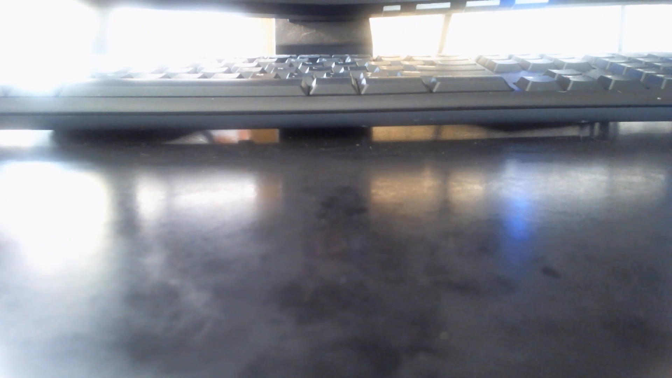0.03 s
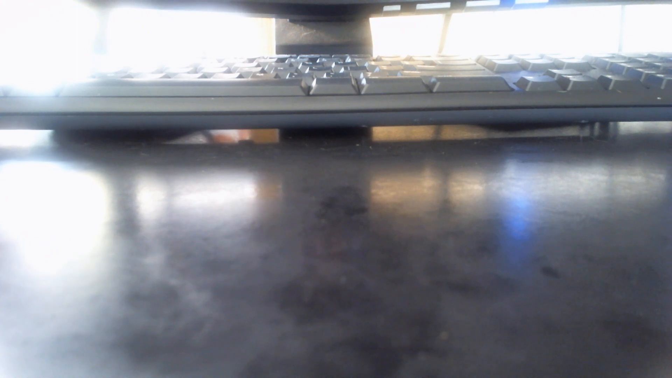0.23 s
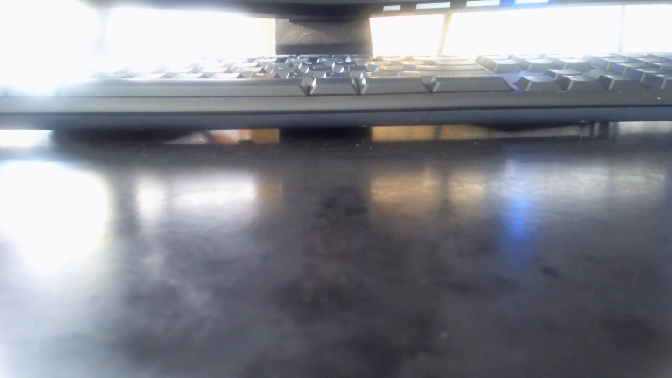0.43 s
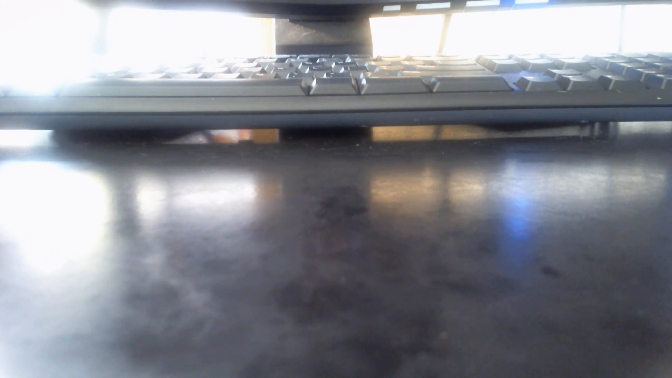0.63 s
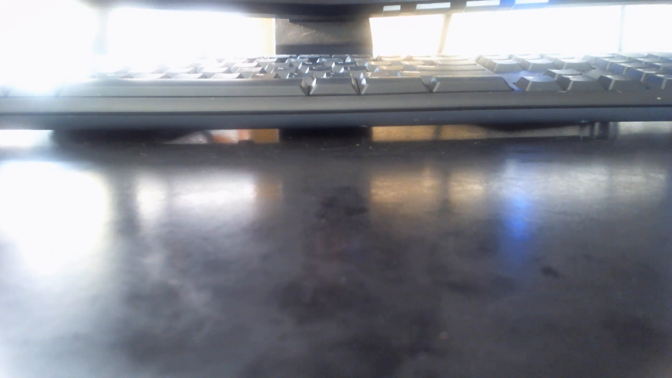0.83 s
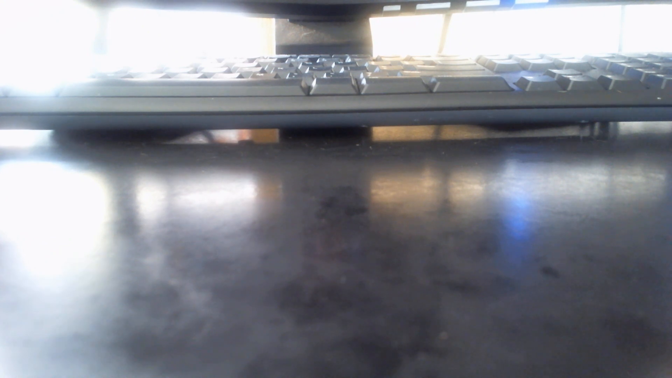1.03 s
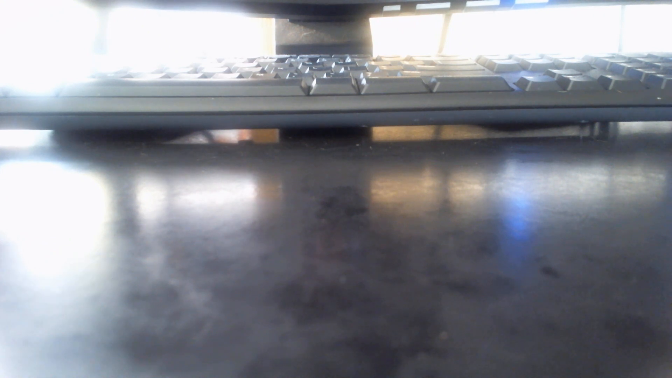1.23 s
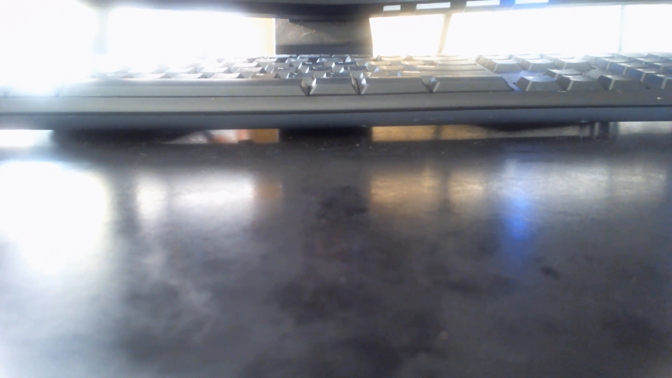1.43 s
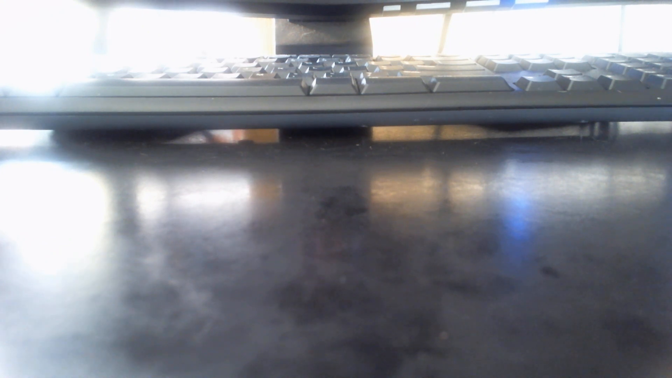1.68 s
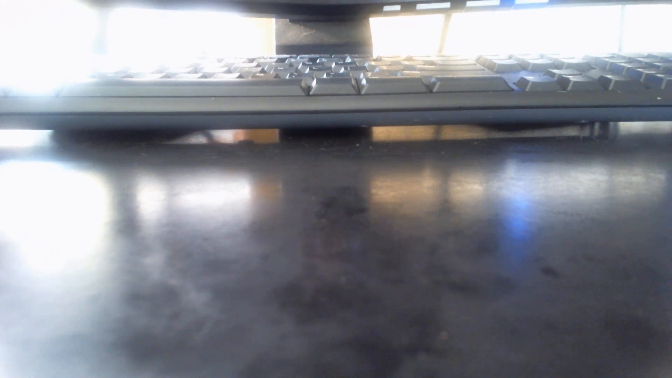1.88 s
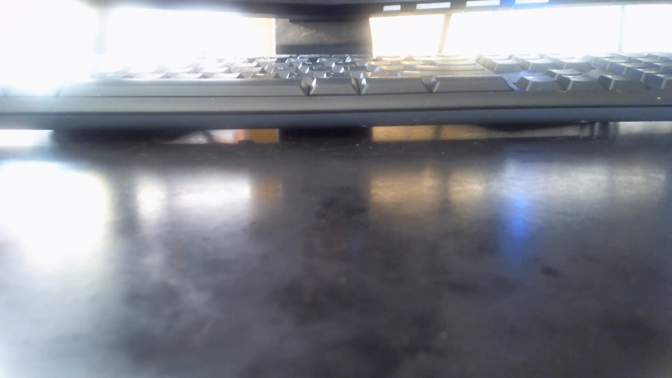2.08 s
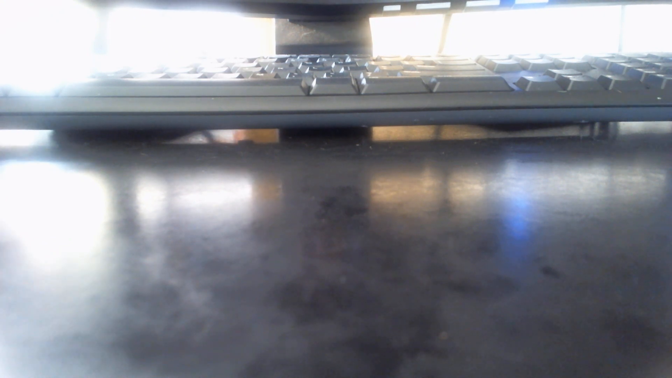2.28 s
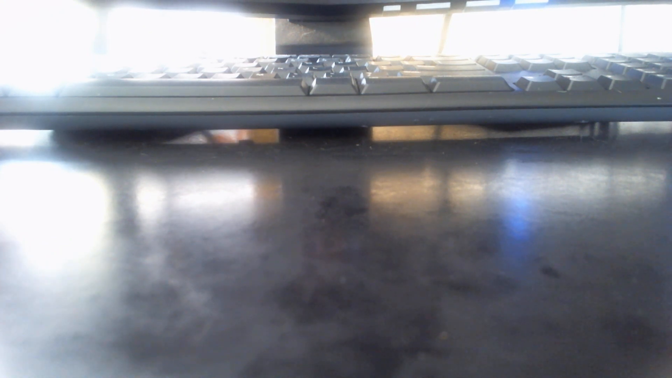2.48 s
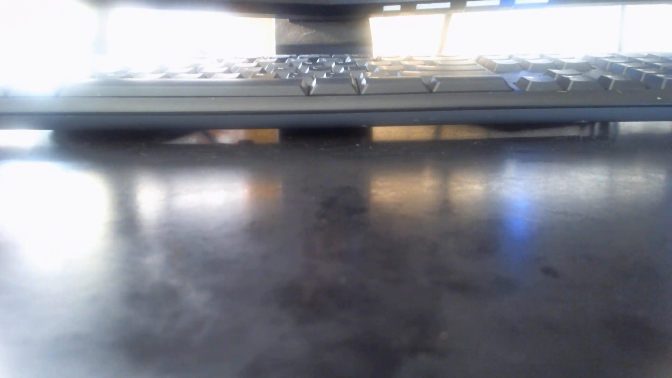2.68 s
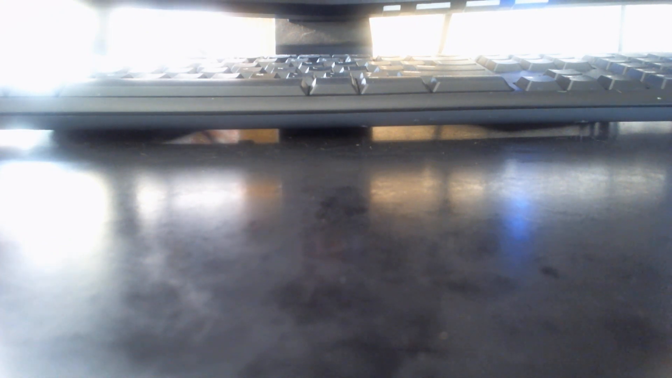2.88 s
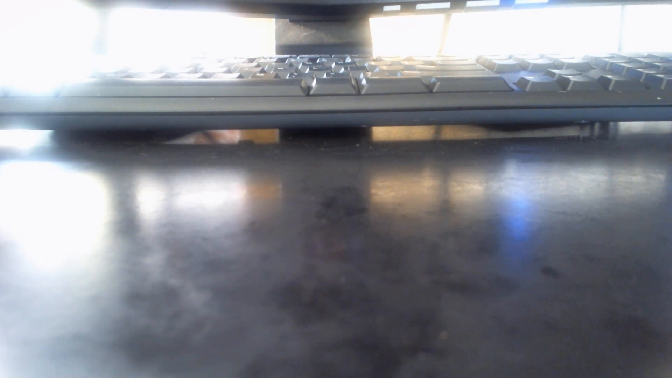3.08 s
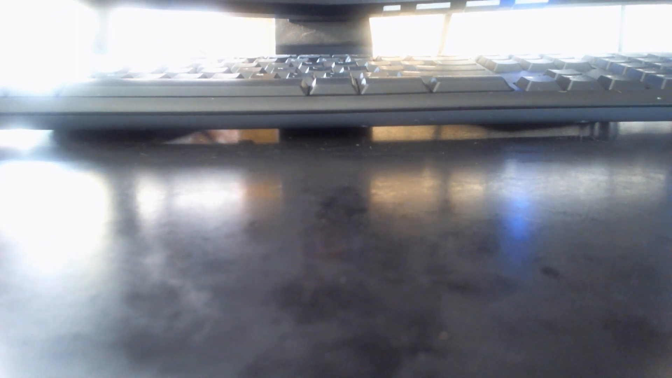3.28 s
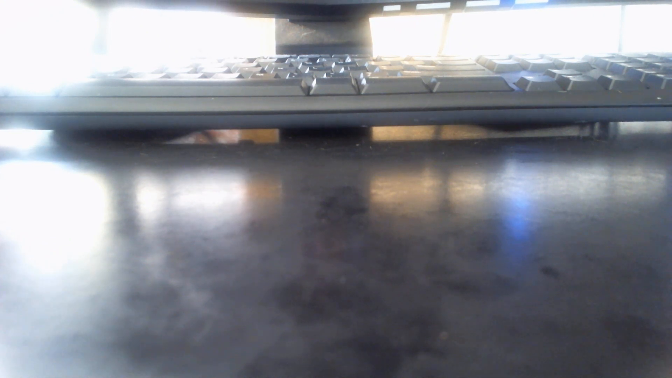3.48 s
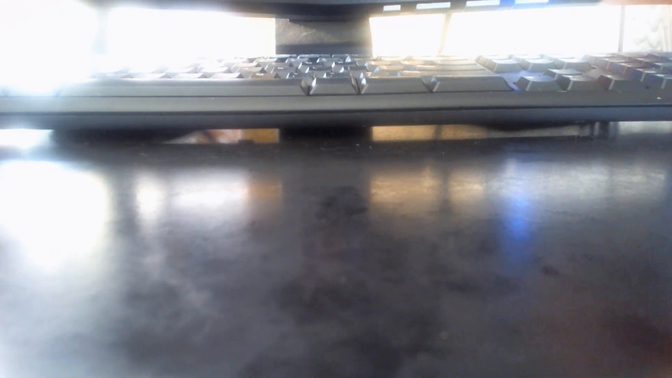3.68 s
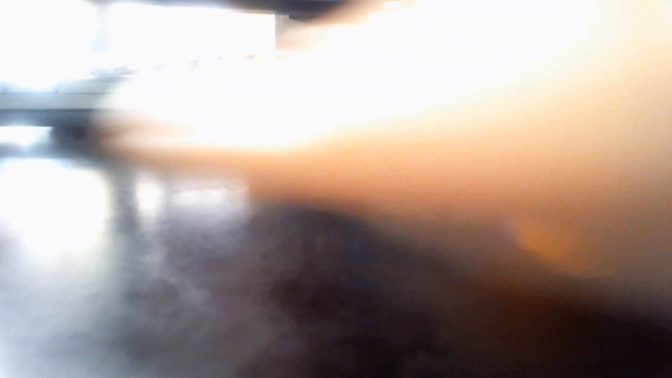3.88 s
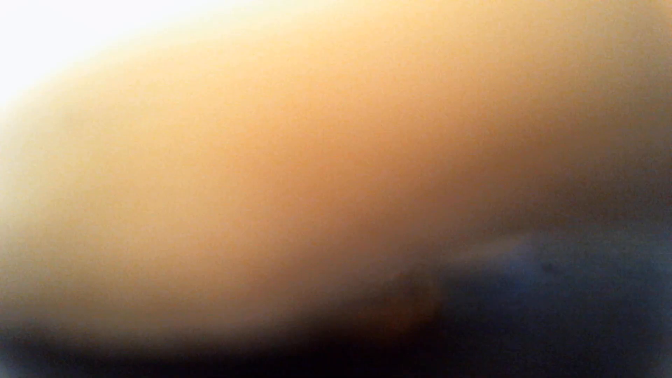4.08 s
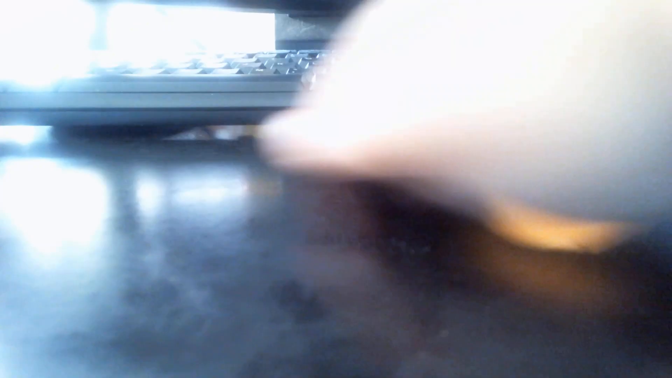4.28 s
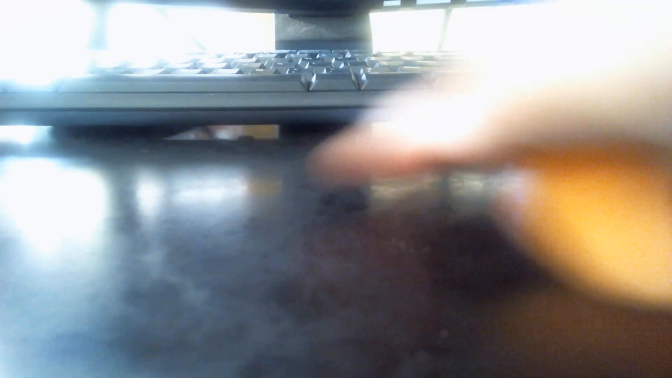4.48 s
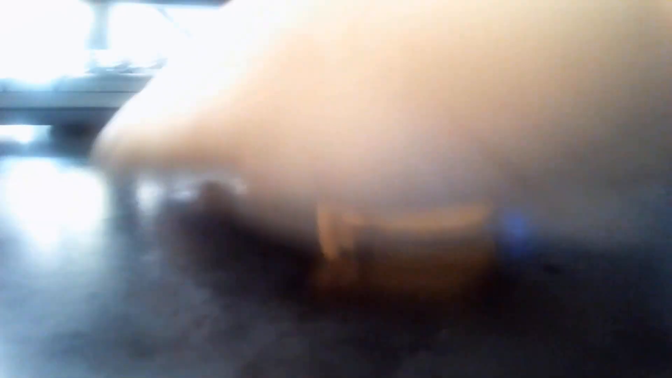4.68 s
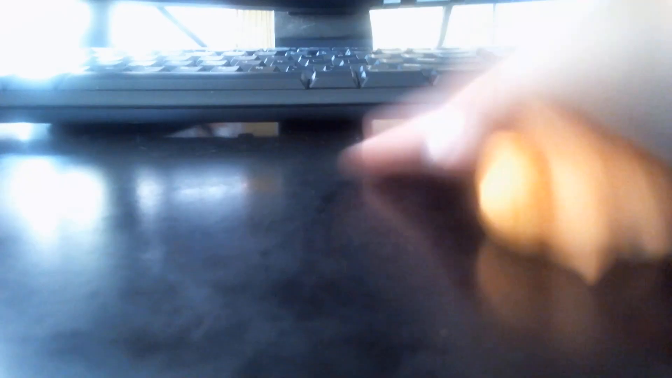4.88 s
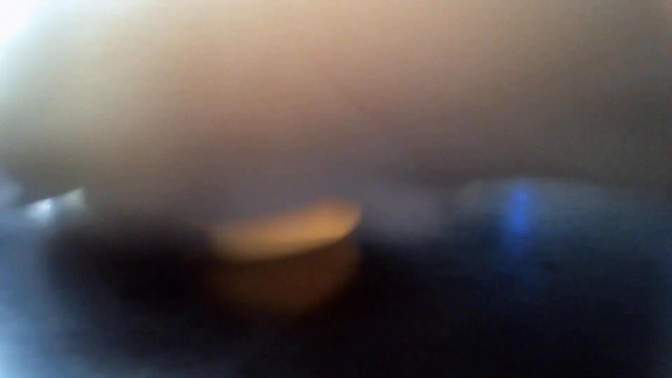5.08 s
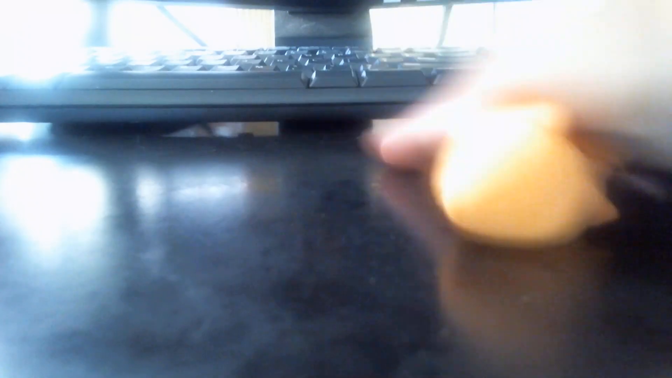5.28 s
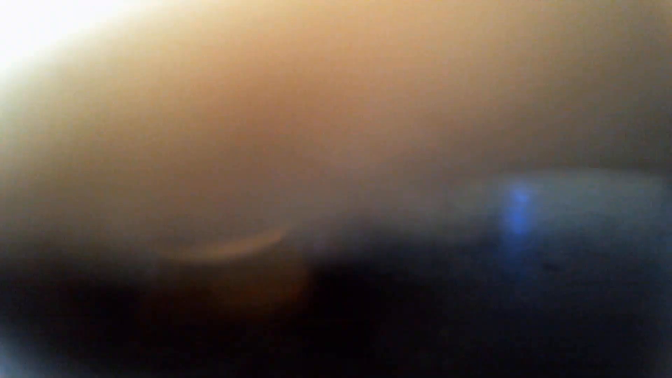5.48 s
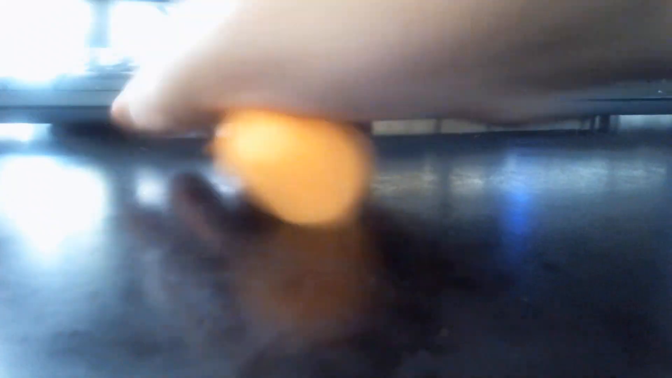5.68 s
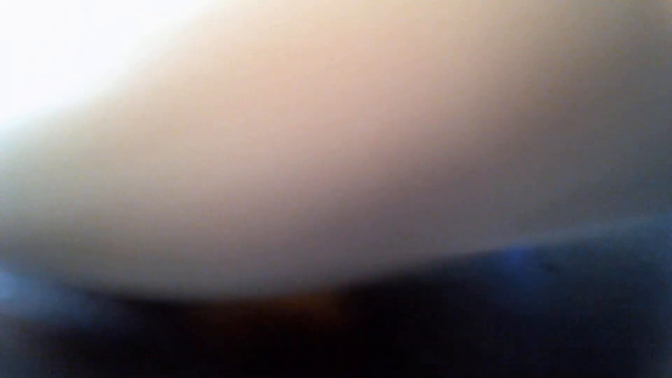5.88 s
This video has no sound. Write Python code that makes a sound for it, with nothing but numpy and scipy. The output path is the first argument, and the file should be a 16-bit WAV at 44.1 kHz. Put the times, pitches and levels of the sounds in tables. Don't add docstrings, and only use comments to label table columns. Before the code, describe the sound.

Faint whine and fluttering buzz over room hiss, then a hand clicks, scratches and scuffs a hard desk very close to the microphone.

```python
import sys
import numpy as np
from scipy import signal
from scipy.fft import rfft, irfft
from scipy.io import wavfile
from scipy.ndimage import uniform_filter1d

SR = 44100
rng = np.random.default_rng(int(sys.argv[2]) if len(sys.argv) > 2 else 0)


def boost(x):
    u = np.asarray(x, float) / 20
    return 10 ** u


def dump_mix(stems):
    frames = np.atleast_2d(stems).T
    limited = np.clip(frames, -1, 1)
    pcm = np.round(limited * 32767).astype(np.int16)
    wavfile.write(sys.argv[1], SR, pcm)


N = 261072

# frequency in Hz, level in dB.
DESK_TONE = [(150, -3), (280, 8.5), (550, 4), (900, 1), (1500, 3), (2100, 5.5), (2700, -3), (4000, -35)]
FIZZ_DB_PER_OCTAVE = 8


def evened(x):
    return x / np.sqrt(np.mean(x ** 2) + 1e-20)


def add(mix, s, sound):
    part = mix[round(s * SR):][:len(sound)]
    part += sound[:len(part)]


def coloured(x, points):
    hz, db = np.transpose(points)
    f = np.fft.rfftfreq(len(x), 1 / SR)
    gain = boost(np.interp(np.log(f + 1), np.log(hz + 1), db))
    return irfft(rfft(x) * gain, len(x))


def resonate(x, hz, width):
    turn = np.exp(2j * np.pi * np.cumsum(hz * np.ones(len(x))) / SR)
    r = np.exp(-np.pi * width / SR)
    return 2 * (turn * signal.lfilter([1 - r], [1, -r], x / turn)).real


def rubbing():
    # time in seconds, pressure in dB, speed from 0 to 1, palm share in dB.
    rubs = [
        [(3.586, -41, 0.7, -1), (3.63, -35.5, 0.4, -7), (3.72, -36.5, 0.3, -4), (3.78, -43, 0.52, -0.5),
         (3.934, -45, 0.53, -4), (4.07, -37, 0.23, -5), (4.2, -39.5, 0.1, -2), (4.386, -38, 0.58, -5),
         (4.6, -54, 0.4, 6.5)],
        [(4.6, -39.5, .05, 6), (4.73, -46.5, 0.53, -6.5), (4.82, -47.5, 0.68, 0), (4.926, -39.5, 1, -0.5),
         (5.02, -42.5, 0.58, -3.5), (5.1, -40, 0.52, -8.5), (5.22, -43.5, 0.23, -4)],
        [(5.22, -43, 0.2, 0), (5.286, -40, 0.57, -10), (5.338, -43, 0.86, -16), (5.42, -44, 0.52, -5),
         (5.46, -47.5, 0.55, 7), (5.52, -37, 0.58, -10), (5.59, -46, 0.43, -5), (5.7, -54, 0, 5)],
    ]
    # start in seconds, length in seconds, pressure in dB,
    # speed from 0 to 1, palm share in dB.
    brushes = [(1.21, .14, -56, 0.1, 0), (1.878, .11, -42.5, .1, -7), (1.989, 0.28, -52.5, .3, -5),
               (2.602, .24, -51, .35, -1.5), (2.871, 0.093, -49, .35, -5), (3.098, .12, -55, 0.3, -3),
               (3.467, 0.082, -49, 0.1, -12), (5.7, 0.21, -47, .45, -7)]
    # start in seconds, length in seconds, first pitch in Hz, last pitch in Hz, level in dB.
    squeaks = [(2.571, 0.0053, 1710, 1750, -40.5), (3.008, 0.067, 3700, 3730, -56.5),
               (4.476, 0.02, 944, 950, -41), (4.593, 0.057, 221, 141, -28.5),
               (4.901, .008, 6750, 7300, -14), (4.895, .009, 6200, 6950, -25), (2.864, .04, 290, 288, -30),
               (2.893, .075, 290, 290, -40.5), (5.537, 0.019, 1580, 1560, -42)]
    groans = [(2.857, 0.025, 290, 290, -35), (4.908, .014, 2050, 1950, -33), (4.936, .009, 2000, 2000, -34),
              (4.956, .008, 1900, 2050, -33), (3.116, 0.0091, 1130, 1150, -40),
              (4.997, 0.028, 282, 250, -42.5), (3.54, 0.01, 760, 460, -41.5), (4.584, .018, 234, 230, -35),
              (4.645, 0.039, 180, 168, -40), (3.538, .038, 620, 500, -42), (4.08, 0.053, 270, 250, -45)]
    rasps = [(1.076, 0.024, 800, 700, -51), (2.859, 0.035, 560, 430, -35.5),
             (3.588, 0.067, 13500, 13500, -59), (3.6555, .0025, 14600, 14500, -25),
             (3.659, .03, 1500, 1550, -32.5), (3.684, .034, 1500, 1050, -32), (4.472, 0.054, 414, 363, -41),
             (4.744, 0.028, 347, 330, -43), (4.909, .081, 2066, 1900, -44), (4.33, .1, 456, 400, -50)]
    thuds = [(4.585, .075, 330, 280, -38), (2.895, .06, 650, 400, -42), (3.657, .06, 450, 400, -44),
             (1.905, .04, 500, 450, -45), (5.7, .12, 330, 300, -46), (4.895, .07, 12500, 12000, -55),
             (1.907, .009, 3300, 3450, -31)]
    # time in seconds, peak in dB, ring in Hz.
    thumps = [(3.542, -36, 700), (4.478, -34, 900), (5.625, -36, 2500)]
    # start in seconds, peak in dB, pitch in Hz, cycles.
    bumps = [(0.642, -37.5, 60, 2.2), (3.036, -26, 47.3, 1.14), (3.057, -18.5, 71.6, .8),
             (3.076, -30, 44.8, 1.4), (3.14, -28.5, 28.4, 0.96), (3.177, -27, 29.5, 0.74),
             (3.222, -23.5, 37.6, 0.95), (4.189, -31.5, 94, 2.5), (4.769, -34.5, 35, 2),
             (5.44, -38, 149, 6.5)]
    # start in seconds, peak in dB, pitch in Hz, length in seconds (it fades by 12
    # dB over that time).
    pings = [(1.362, -50.5, 1086, .11), (3.262, -47.5, 1092, .11)]
    hand = np.zeros(N)
    for rows in rubs:
        add(hand, *stroke(rows))
    for s, length, *how in brushes:
        add(hand, *stroke([(s, *how), (s + length, *how)]))
    for table, rough in ((squeaks, .22), (groans, .54), (rasps, .86), (thuds, .86)):
        for row in table:
            add(hand, *groan(*row, rough))
    for row in thumps:
        add(hand, *tap(*row, low_db=10.5, bright_db=-30, length=.0075))
    for row in bumps:
        add(hand, *bump(*row))
    for row in pings:
        add(hand, *ping(*row))
    return hand


def stroke(rows):
    # start in seconds,
    # length in seconds, band in Hz, width in Hz, change in dB.
    arches = [(4.005, .11, 3000, 800, -9), (4.16, .055, 3000, 800, -8), (4.21, .2, 2300, 350, -5),
              (5.345, .08, 2800, 1300, -6), (5.808, .032, 4500, 5000, -8), (4.75, .09, 2500, 1500, -5)]
    shadow_hz, shadow_width_hz, shadow_depth_db = 2240, 310, -5.5
    patchy_db, catchy_db = 1.5, 2.2
    s, *columns = np.transpose(rows)
    t = np.arange(s[0], s[-1], 1 / SR)
    nail_db, speed, palm_db = (np.interp(t, s, c) for c in columns)
    hz = 3300 + (4700 - 3300) * speed
    fizz_db = -22 + (2.3 + 22) * speed
    rub = contact(len(t), hz, 0.24, palm_db, fizz_db, grit=.28)
    z = signal.stft(rub, nperseg=256, noverlap=192)[2]
    bin_hz = np.fft.rfftfreq(256, 1 / SR)[:, None]
    bin_s = s[0] + np.arange(z.shape[1]) * 64 / SR
    shadow_db = shadow_depth_db * np.exp(-((bin_hz - shadow_hz) / shadow_width_hz) ** 2)
    for start, length, band_hz, band_width_hz, db in arches:
        along = np.clip((bin_s - start) / length, 0, 1)
        across = np.exp(-((bin_hz - band_hz) / band_width_hz) ** 2)
        shadow_db = shadow_db + db * across * np.sqrt(abs(np.sin(np.pi * along)))

    def drift(bins, steps):
        rough = rng.standard_normal(z.shape)
        return evened(uniform_filter1d(uniform_filter1d(rough, size=bins, axis=0), size=steps, axis=1))

    gain_db = shadow_db + patchy_db * drift(4, 40) + catchy_db * drift(22, 2)
    sound = signal.istft(z * boost(gain_db), nperseg=256, noverlap=192)[1][:len(t)]
    ends = np.minimum(1, np.minimum(t - s[0], s[-1] - t) / 0.0052)
    return s[0], boost(nail_db - 5.0) * sound * ends


def groan(s, length, first_hz, last_hz, db, rough):
    t = np.linspace(0, 1, round(length * SR))
    hz = first_hz + (last_hz - first_hz) * t
    wobble = evened(uniform_filter1d(uniform_filter1d(rng.standard_normal(len(t)), size=90), size=60))
    turns = 2 * np.pi * np.cumsum(hz * (1 + 0.062 * rough * wobble)) / SR
    overtone = 0.45 * (first_hz < 1000) * (1 - t) ** 2 * np.sin(2 * turns + 1)
    tone = np.sin(turns) + overtone
    width = rough * first_hz
    smear = resonate(resonate(rng.standard_normal(len(t)), hz, .6 * width), hz, 0.8 * width)
    sound = evened((1 - rough) * evened(tone) + rough * evened(smear))
    return s, boost(db) * sound * signal.windows.tukey(len(t), 1 - .5 * rough)


def bump(s, db, hz, cycles):
    t = np.arange(round(cycles / hz * SR)) / SR
    return s, boost(db) * np.sin(2 * np.pi * hz * t) * np.hanning(len(t)) ** 0.39


def ping(s, db, hz, fade_s):
    t = np.arange(round(fade_s * SR)) / SR
    buzz = evened(resonate(rng.standard_normal(len(t)), hz, 90))
    rattle = evened(np.sin(2 * np.pi * hz * t) + .8 * buzz)
    return s, boost(db - 3 - 60 * t / (5 * fade_s)) * rattle * signal.windows.tukey(len(t), .12)


def touches():
    # time in seconds, peak in dB, ring in Hz,
    # weight on the desk in dB, dryness in dB.
    clicks = [(1.9151, -14, 4000, -7, -7), (1.9398, -13, 4200, -8, -2), (2.6311, -23.5, 7400, -25, 2),
              (2.7223, -31, 3420, -18, 0), (2.9957, -17.5, 4340, -0.5, 0), (3.1588, -23, 4480, -25, 0),
              (3.1735, -28, 4100, -17, -6), (3.1922, -22, 5500, -16.5, -5), (3.6864, -14.5, 5740, -1, -10),
              (3.8847, -14.5, 6230, -24, 0), (3.9149, -19.5, 4720, -11, 0), (4.58, -27, 2220, 7, 0),
              (4.6663, -19, 3500, -13, -5), (4.7013, -21, 3800, -30, -2), (4.8712, -15.5, 7600, -18, 4),
              (4.9556, -13, 5000, -16, -2), (5.0507, -13.5, 2900, -5, 2), (5.0683, -15, 6300, -26, 0),
              (5.3099, -19.5, 4800, -12, -5), (5.3457, -21, 5900, -25, -1), (5.4228, -12, 5040, -16, -5),
              (4.3938, -25, 5900, -18, 0), (3.656, -1, 5700, -10, -13), (4.8953, -21, 5500, -7, 6),
              (4.9018, -19, 5500, -20, -3), (4.918, -14, 5000, -8, 0), (5.0215, -26, 5000, -10, -3),
              (5.0335, -25, 3500, -14, -5), (5.0805, -26, 4600, -16, -3), (5.737, -24, 4000, -10, -3),
              (5.757, -21, 3400, -6, -2), (5.786, -23, 5200, -19, -6), (5.791, -21, 4980, -9, -5),
              (3.9755, -30, 5000, -14, 0), (4.3615, -30, 6500, -22, 0)]
    taps = [(1.253, -32, 4120, -14, 0), (1.8969, -25, 3600, -18, -8), (1.9228, -17.5, 3420, -9, -3),
            (1.9356, -28, 3470, -6, 0), (2.1249, -35, 6160, -20, 3), (2.6697, -22, 4800, -25, 2),
            (2.7825, -26.5, 3490, -16, 0), (2.8443, -16, 5000, -9, 5), (2.8955, -14, 5980, -11, 4),
            (2.9915, -30, 4200, -14, 0), (3.6572, -7, 4300, -6, -6), (3.7175, -16, 5300, -14, 0),
            (3.8262, -22.5, 4460, -14, 0), (3.8924, -21, 4900, -22, 0), (4.6051, -21, 4300, -16, -6),
            (4.6287, -18.5, 4200, -14, -12), (5.0443, -18.5, 3250, -3, 11), (5.0722, -15, 4300, -22, 6),
            (5.2719, -29, 6200, -14, 3), (5.2908, -18, 3300, -13, 12), (5.4354, -7, 5900, -15, 8),
            (5.4929, -29, 5800, -3, 12), (5.665, -28, 3000, -12, 0), (5.6759, -30, 4110, -6, 0),
            (5.9165, -25, 3200, -9, -2), (1.0784, -29, 3100, -3, -3), (5.0095, -25, 3000, -9, 3),
            (5.497, -25, 4300, -8, 0), (5.264, -29, 3500, -14, -5), (5.353, -29, 4800, -20, -5),
            (4.8775, -26, 2200, -6, 3), (4.0775, -26, 4470, -20, -3), (4.14, -29, 5410, -18, 3),
            (5.705, -34, 4200, -12, -3), (5.894, -25, 4300, -12, 0), (3.6995, -19, 4500, -6, 0)]
    dabs = [(1.9068, -18, 5320, -11, 0), (1.929, -19, 3700, -12, 0), (2.1399, -40, 5750, -9, 0),
            (2.8122, -34, 3290, -13, 0), (3.6664, -19, 5170, -6, -4), (3.9098, -23, 5200, -18, 0),
            (4.9205, -17, 5900, -14, 0), (5.4588, -19, 2610, -11, 5), (5.5405, -22.5, 3600, -7, -8),
            (5.729, -30, 4800, -13, 0), (5.747, -23, 3400, -14, 3), (4.3712, -22.5, 4500, -15, 6)]
    # time in seconds, peak in dB.
    frame_ticks = [(4.0076, -32), (4.0576, -28), (4.1076, -25), (4.1576, -25), (4.2076, -28), (4.2576, -29)]
    # start in seconds, length in seconds, level in dB, resonance in Hz.
    scuffs = [(1.296, .014, -49, 2300), (1.901, 0.022, -30, 3430), (1.921, 0.03, -35, 3500),
              (2.678, 0.016, -39, 3950), (2.691, 0.019, -34.5, 3420), (2.776, 0.008, -41.5, 3400),
              (3.109, .022, -39.5, 4400), (3.148, .008, -50, 4750), (3.659, 0.062, -30, 5300),
              (3.728, .03, -40, 5300), (3.79, 0.011, -32.5, 5850), (3.802, 0.012, -28, 5900),
              (3.859, 0.023, -29.5, 5960), (3.98, .018, -36, 3350), (4.25, .028, -39, 4200),
              (4.484, .014, -41, 5400), (4.539, 0.011, -35.5, 3300), (4.591, .012, -37, 3000),
              (4.634, .03, -35, 3530), (4.667, 0.017, -40, 3440), (4.682, 0.021, -33, 3650),
              (4.74, 0.022, -37.5, 7140), (4.853, 0.01, -39, 5500), (4.897, 0.062, -28, 5800),
              (4.956, .008, -33, 4500), (4.975, 0.065, -36.5, 2820), (5.041, 0.008, -34, 2400),
              (5.418, 0.019, -34, 5740), (5.457, 0.02, -38.5, 2480), (5.728, 0.04, -39, 3200),
              (5.777, 0.04, -32, 5040), (5.9, 0.024, -38.5, 4500), (5.75, .028, -43, 7500),
              (5.764, .013, -38, 4000), (5.835, .03, -43, 3000), (5.878, .025, -41, 4500),
              (2.62, .005, -47, 7500), (2.635, .004, -42, 4200), (2.65, .004, -46, 5000),
              (2.684, .005, -41, 6500), (2.828, .004, -50, 8000), (2.884, .005, -44, 7500),
              (2.953, .004, -49, 7000), (3.145, .014, -53, 8000), (3.485, .045, -47, 3600),
              (3.605, .03, -42, 3400), (2.852, .008, -45, 7000), (4.1, .08, -44, 6000)]
    light = np.zeros(N)
    echoed_ticks = []
    for s, db in frame_ticks:
        for late_s, softer_db in ((0, 0), (0.0105, -8)):
            echoed_ticks.append((s + late_s, db + softer_db, 3400, -8, 0))
    kinds = ((clicks, -9.5, .001), (taps, -19.5, .0029), (dabs, -19, .0075), (echoed_ticks, -27, .005))
    for table, fizz_db, length in kinds:
        for s, db, hz, low_db, dry_db in table:
            bright_db = dry_db + fizz_db + FIZZ_DB_PER_OCTAVE * np.log2(hz / 4000)
            add(light, *tap(s, db, hz, low_db, bright_db, length))
    for row in scuffs:
        add(light, *scuff(*row))
    return coloured(light, [(100, 0), (10500, 0), (12500, -5), (16000, -6)])


def tap(s, db, hz, low_db, bright_db, length):
    # frequency in Hz, level in dB.
    knock_tone = [(200, -20), (450, -4), (800, 0), (1250, 6), (1600, 3), (2100, 5.5), (2700, -3),
                  (4000, -35)]
    t = np.arange(1200) / SR
    fall = boost(-25 * t / length) + boost(-29 - 25 * t / .016)
    rise_s = .0005 + .25 * length
    rise = np.sin(np.pi / 2 * np.minimum(t / rise_s, 1)) ** 2
    touch = contact(len(t), hz, 0.9, low_db + 2.5, bright_db - 2.5, grit=0, desk_tone=knock_tone)
    sound = (touch + 0.8 * np.sin(2 * np.pi * hz * t)) * fall * rise
    return s - rise_s / 2, boost(db + 0.62) * sound / abs(sound).max()


def scuff(s, length, db, hz):
    size = round(length * SR)
    octaves = np.log2(hz / 4000)
    low_db = -12.5 - 10.5 * octaves
    bright_db = -16.5 + FIZZ_DB_PER_OCTAVE * octaves
    sag = boost(db - 80 * np.arange(size) / SR)
    slide = contact(size, hz, 0.81, low_db, bright_db, grit=0.25)
    return s, sag * slide * signal.windows.tukey(size, .6)


def contact(length, hz, ring, low_db, bright_db, grit=.3, desk_tone=DESK_TONE):
    # frequency in Hz, level in dB.
    nail_tone = [(1500, -65), (2500, 1), (3500, 6), (4700, 8), (5700, 10), (6500, 5), (7600, -5),
                 (10000, -48)]
    fizz_tone = [(5500, -38), (7300, 6), (9000, 8), (11000, -3.5), (12500, -17), (15500, -33), (16200, -50)]
    pad = length + 1500
    grain_size = boost(4.0 * np.minimum(rng.exponential(1, pad), 3))
    grains = rng.standard_normal(pad) * grain_size * (rng.random(pad) < 1800 / SR)
    drive = (1 - grit) * rng.standard_normal(pad) + grit * evened(grains)
    nail, desk, fizz = (evened(coloured(drive, c))[-length:] for c in (nail_tone, desk_tone, fizz_tone))
    drive = drive[-length:]
    spot = evened(resonate(resonate(drive, hz, 1800), hz, 1800))
    wander = evened(uniform_filter1d(rng.standard_normal(pad), size=500))[-length:]
    drifting = hz * (1 + .06 * wander)
    whistle = evened(resonate(resonate(drive, drifting, 500), drifting, 1000))
    skin = evened(nail + ring * (spot + .6 * whistle))
    return skin + boost(low_db) * desk + boost(bright_db) * fizz


def fan():
    # frequency in Hz, width in Hz, level in dB.
    port = [
        (5720, 160, -53.5),
        (4630, 90, -65.5),
        (6040, 830, -66.5),
        (1560, 230, -93),
    ]
    fan_hz = 97.4
    unsteady = evened(uniform_filter1d(rng.standard_normal(N), 9000))
    turns = np.arange(N) * fan_hz / SR + 0.27 + 0.014 * unsteady
    tick_size = boost(4.5 * np.clip(rng.standard_normal(N), -3, 2))
    ticks = (np.diff(np.floor(turns), prepend=0) > 0) * tick_size
    puffs = (0.21 + np.exp(-(turns % 1) / 0.27)) * rng.standard_normal(N)
    drive = 0.78 * evened(ticks) + evened(puffs)
    return sum(boost(db) * evened(resonate(resonate(drive, hz, w), hz, 4.0 * w)) for hz, w, db in port)


def camera():
    # first frame in seconds, frames a second, tick level in dB.
    cycles = [(.0015, 17.217, -46), (1.1051, 17.217, -44), (2.5571, 17.217, -48), (3.708, 20.0, -38),
              (4.418, 24.0, -38)]
    # frequencies in Hz, then levels in dB.
    leak_hz = [3816.1, 4183.9, 7999.9, 8367.8]
    leak_db = [-67.5, -62, -67, -68]
    # frequency in Hz, level in dB, 60 dB decay in seconds.
    tick_rings = [(1610, -2, 0.026), (2780, -0.5, 0.015), (3700, -1, 0.0096)]
    readout_s, step_lead_s, step_db = .028, .004, -35
    t = np.arange(N) / SR
    cycles = np.array(cycles)
    current = np.maximum(np.searchsorted(cycles[:, 0], t) - 1, 0)
    first, rate, tick_db = cycles[current].T
    age = ((t - first) * rate % 1) / rate
    reading = age < readout_s
    tones = sum(boost(db + 3.5) * np.sin(2 * np.pi * (hz * t + rng.random())) for hz, db in zip(leak_hz, leak_db))
    loaded = uniform_filter1d(1. * (reading | (age > 1 / rate - step_lead_s)), 50)
    steps = signal.lfilter([1, -1], [1, -np.exp(-1 / (0.0042 * SR))], loaded)
    uneven_db = np.clip(3.5 * rng.standard_normal(N), -9, 5)
    starts = (np.diff(age, prepend=0) < 0) * boost(tick_db + uneven_db)
    u = np.arange(2000) / SR
    tick = sum(boost(db - 60 * u / fade_s) * np.sin(2 * np.pi * hz * u) for hz, db, fade_s in tick_rings)
    tick = tick * (1 - np.exp(-u / 0.00096))
    return reading * tones + boost(step_db) * steps + signal.oaconvolve(starts, tick)[:N]


def air():
    # frequency in Hz, level in dB.
    hiss_tone = [(8.8, -12), (15, 7.5), (59, -18.5), (124, -11), (1410, -28.5), (1540, -28.5),
                 (2250, -31.5), (4290, -32.5), (4960, -31.5), (5750, -20.5), (6850, -45.5), (8170, -35),
                 (9180, -47), (15100, -47), (16500, -70)]
    # frequency in Hz, level in dB.
    hum_lines = [(120.1, -53.5), (172, -66), (1500.9, -67.5)]
    t = np.arange(N) / SR
    hiss = boost(-45.5) * evened(coloured(rng.standard_normal(N), hiss_tone))
    low_tone = [(5, 5.5), (18, -5), (30, -0.5), (55, -5), (100, -9.0), (200, -67)]
    low = evened(coloured(rng.standard_normal(N), low_tone))
    hum = sum(boost(db + 2.5) * np.sin(2 * np.pi * (hz * t + rng.random())) for hz, db in hum_lines)
    return hiss + hum + boost(-5.5 + rumble_db()) * low


def rumble_db():
    # start in seconds, length in seconds, extra rumble in dB.
    leans = [(0, 0.13, 11.5), (2.7, 1.14, 13), (4.01, 0.33, 12), (4.6, 1.12, 8), (5.645, 0.23, 13)]
    level_db = np.full(N, -47.0)
    for s, length, db in leans:
        add(level_db, s, db * signal.windows.tukey(round(length * SR), 0.24))
    return level_db


def scene():
    fingertips_from_s = 4.79
    hand, light = rubbing(), touches()
    firm, fingertips = (signal.sosfilt(signal.butter(3, hz, "highpass", fs=SR, output="sos"), light)
                   for hz in (450, 1300))
    hand += np.where(np.arange(N) < fingertips_from_s * SR, firm, fingertips)
    t = np.arange(9000) / SR
    tail = rng.standard_normal(len(t)) * boost(-60 * t / .3) * (t > .003)
    echoed = coloured(hand, [(150, -21), (500, 5), (6000, -1), (12000, -16)])
    room = signal.oaconvolve(echoed, tail / np.linalg.norm(tail))
    return (hand + boost(-15.0) * room[:N] + air() + camera() + fan())[None]


def roll_off(x):
    return signal.sosfilt(signal.butter(12, 17300, fs=SR, output="sos"), x)


def record(dry):
    held = 1.1 * np.tanh(dry / 1.1)
    edge = signal.firwin(255, 16150, window=("kaiser", 6), fs=SR)
    limited = signal.oaconvolve(held, edge[None], "same")
    return roll_off(limited + .0055)


dry = scene()
out = record(dry)
dump_mix(out)
```